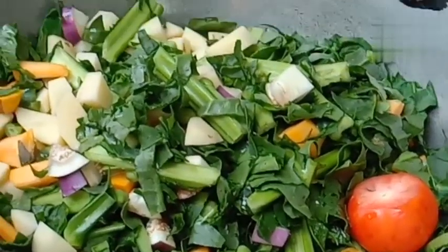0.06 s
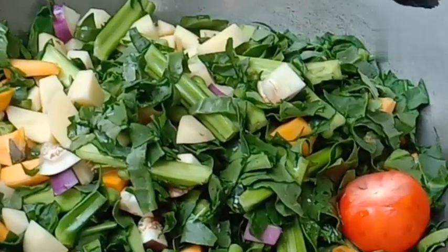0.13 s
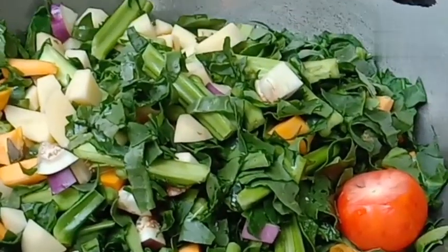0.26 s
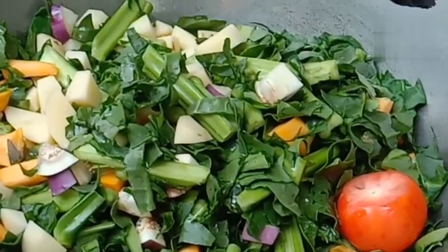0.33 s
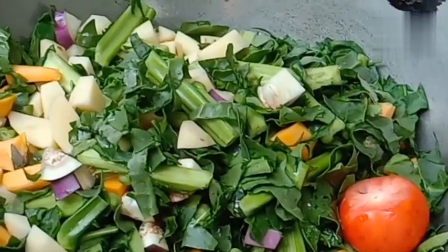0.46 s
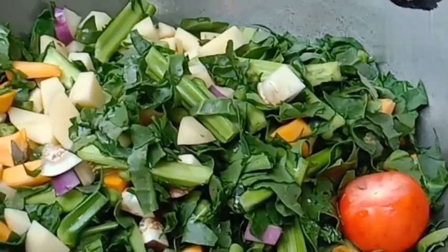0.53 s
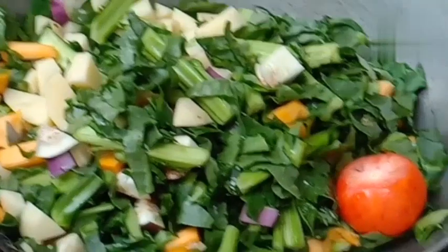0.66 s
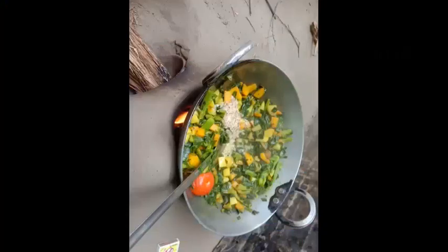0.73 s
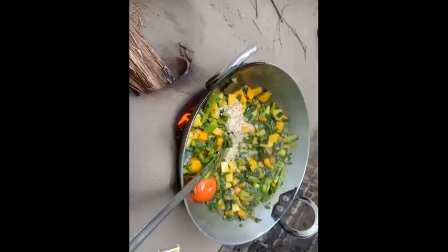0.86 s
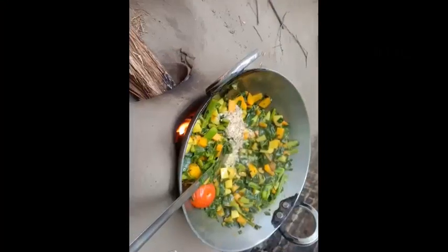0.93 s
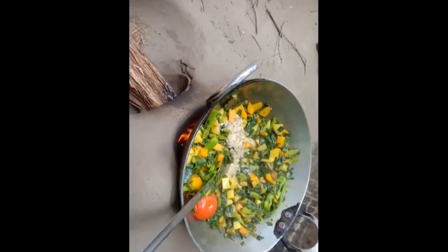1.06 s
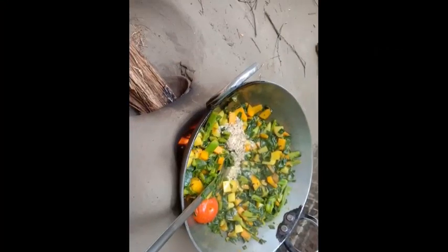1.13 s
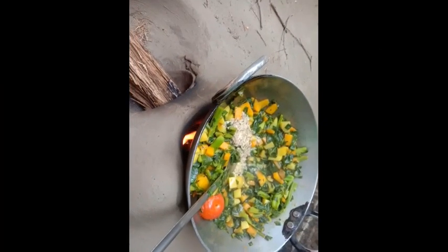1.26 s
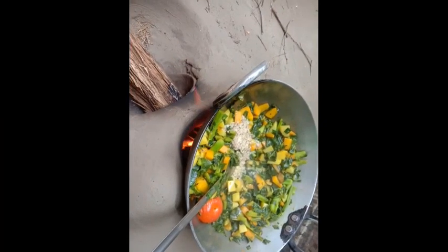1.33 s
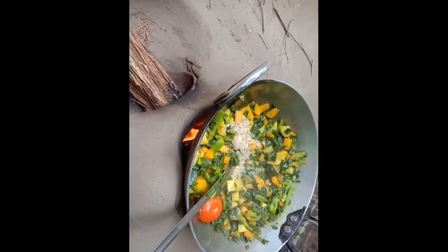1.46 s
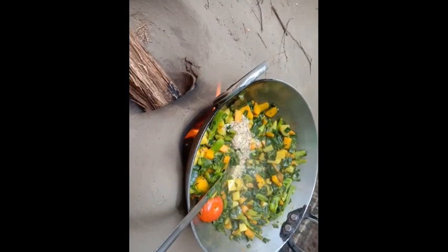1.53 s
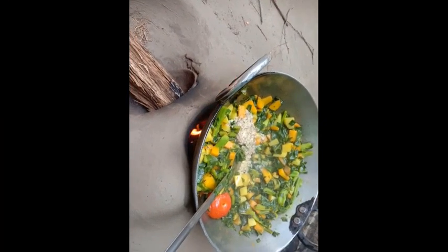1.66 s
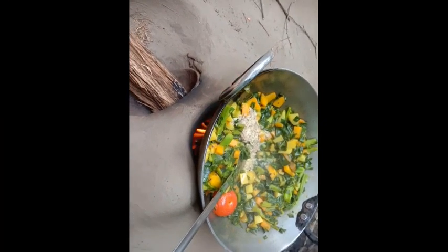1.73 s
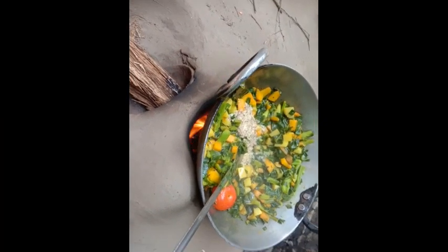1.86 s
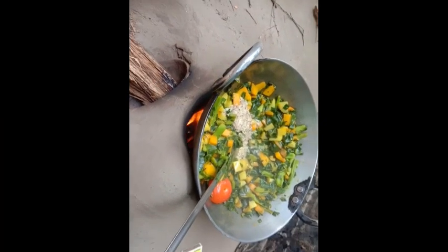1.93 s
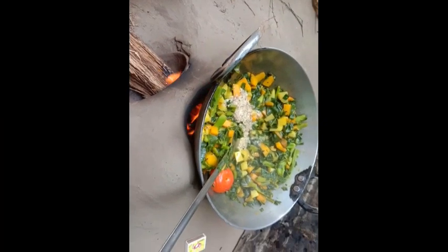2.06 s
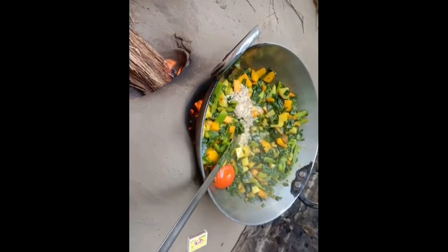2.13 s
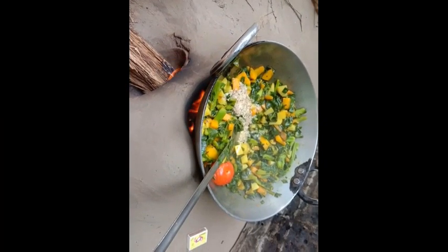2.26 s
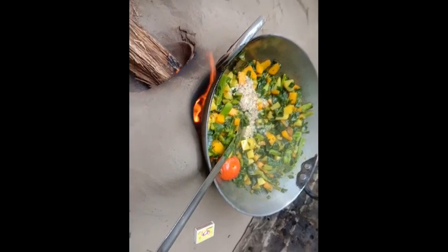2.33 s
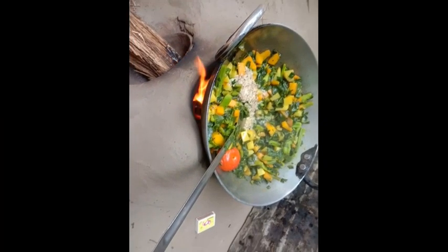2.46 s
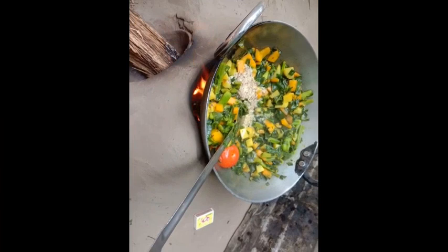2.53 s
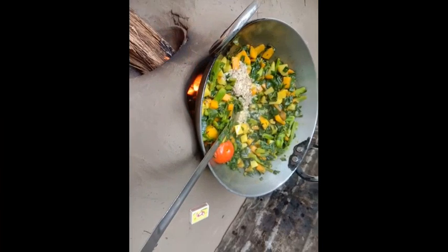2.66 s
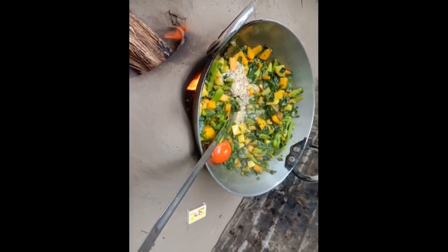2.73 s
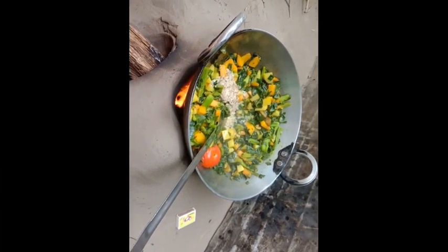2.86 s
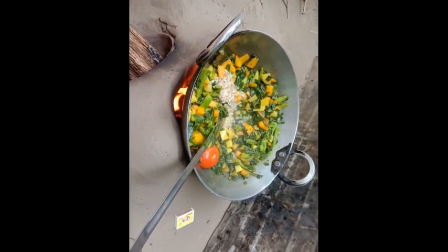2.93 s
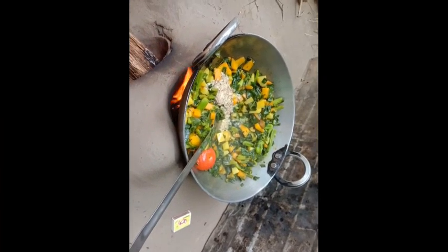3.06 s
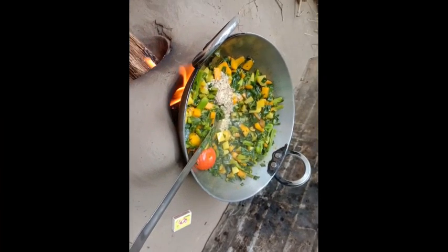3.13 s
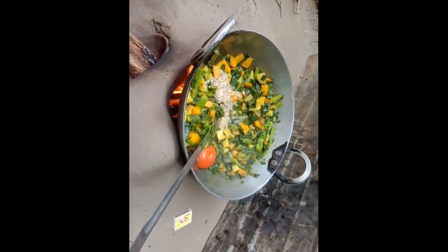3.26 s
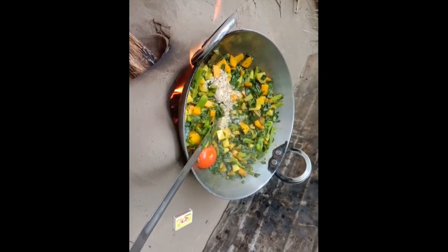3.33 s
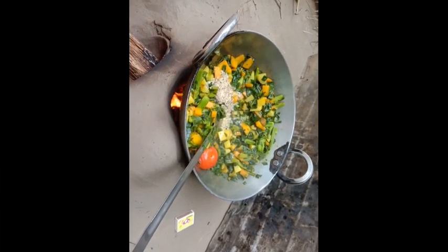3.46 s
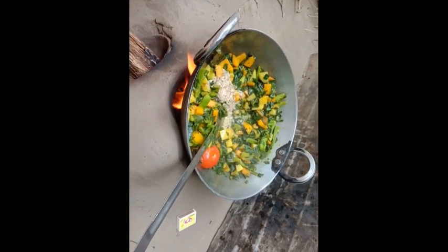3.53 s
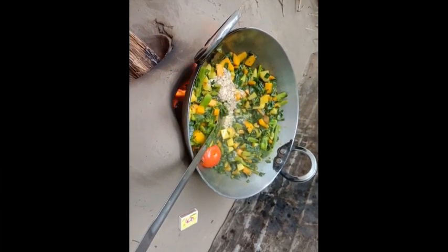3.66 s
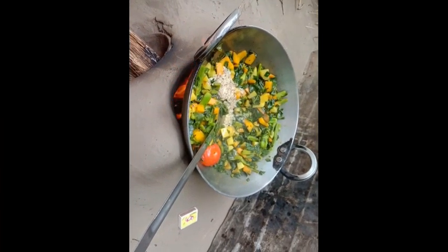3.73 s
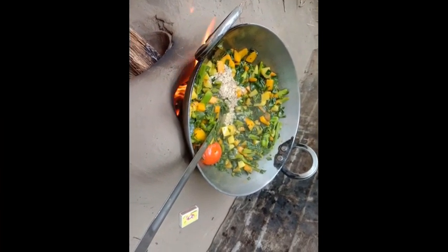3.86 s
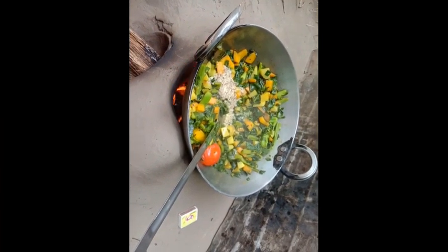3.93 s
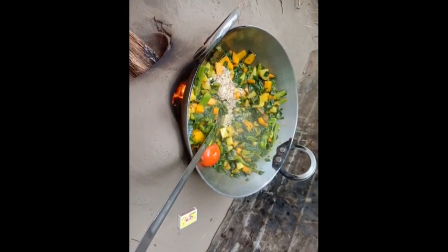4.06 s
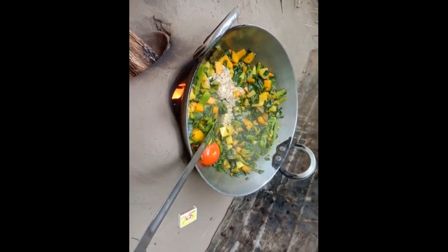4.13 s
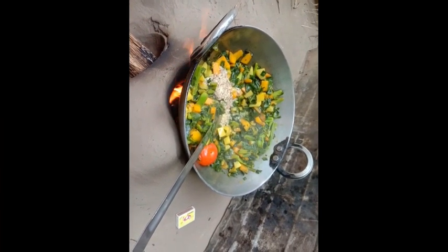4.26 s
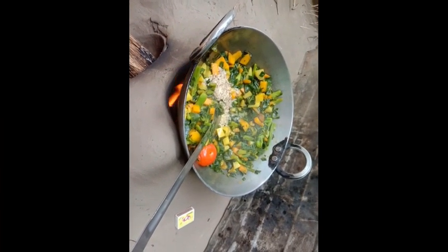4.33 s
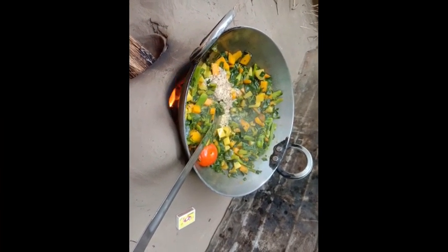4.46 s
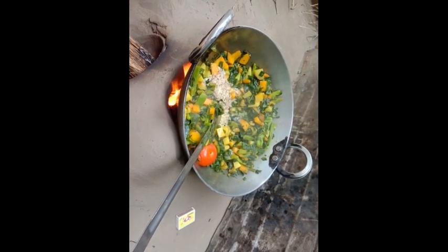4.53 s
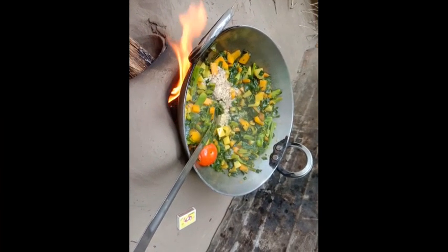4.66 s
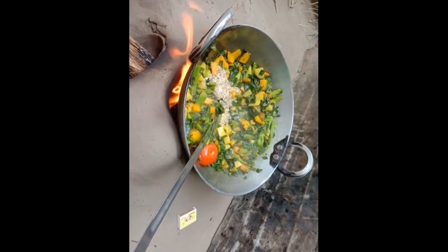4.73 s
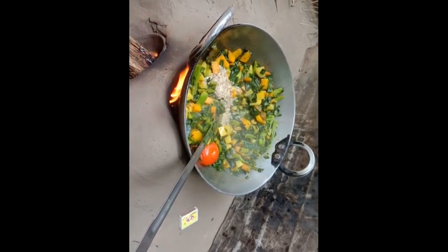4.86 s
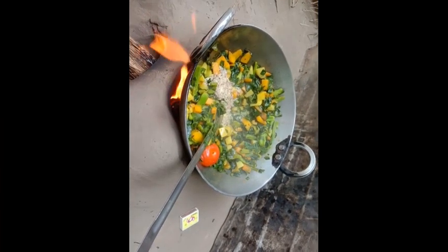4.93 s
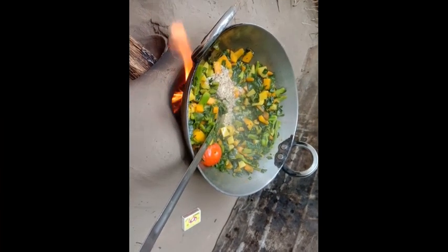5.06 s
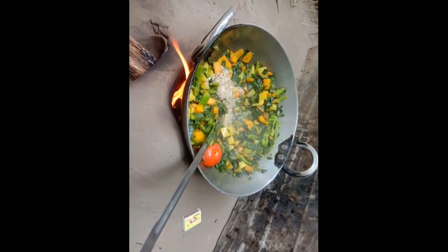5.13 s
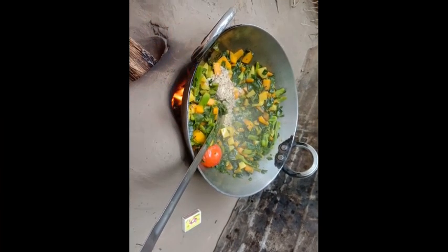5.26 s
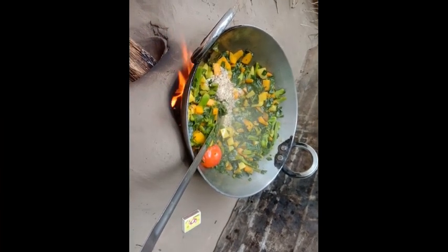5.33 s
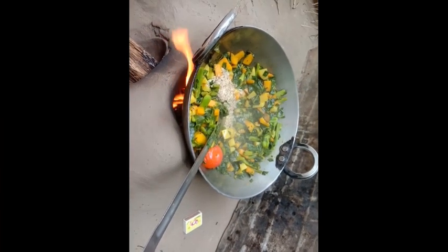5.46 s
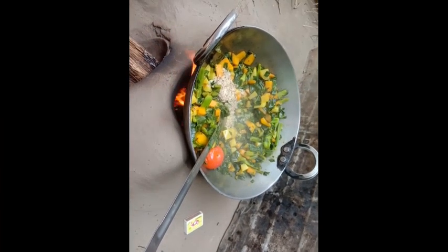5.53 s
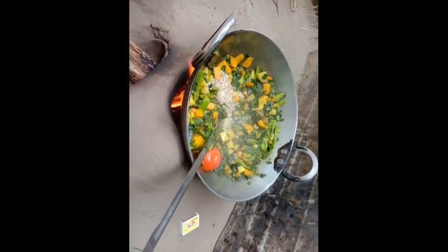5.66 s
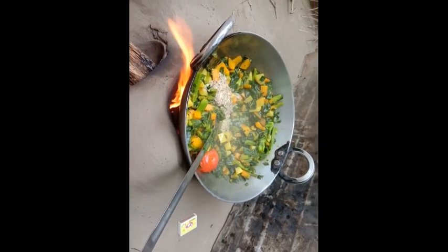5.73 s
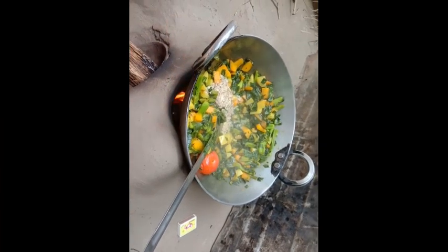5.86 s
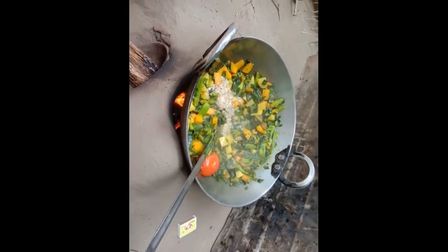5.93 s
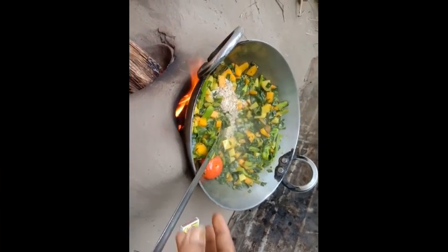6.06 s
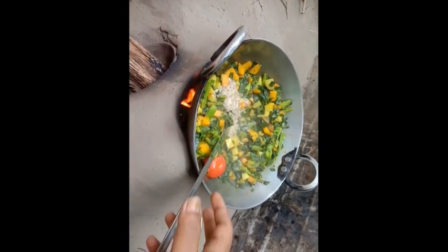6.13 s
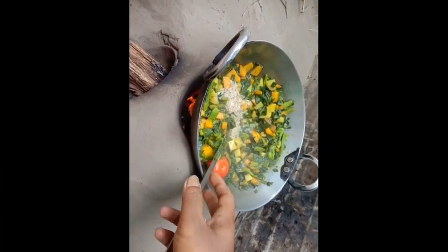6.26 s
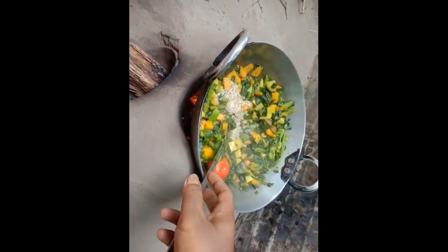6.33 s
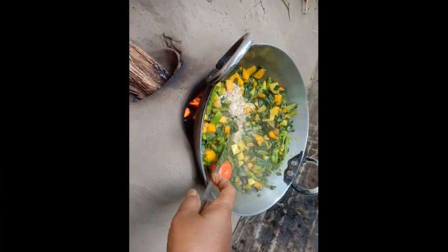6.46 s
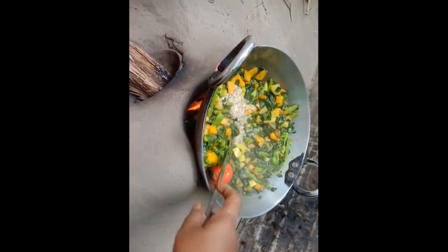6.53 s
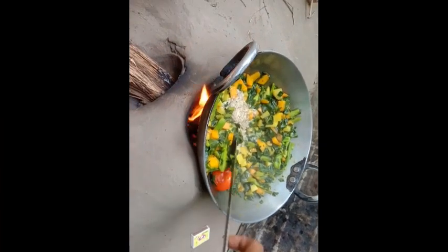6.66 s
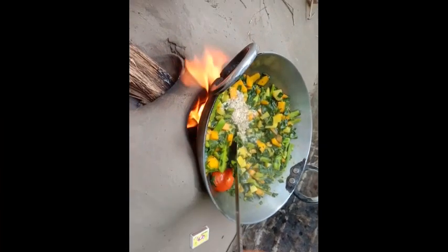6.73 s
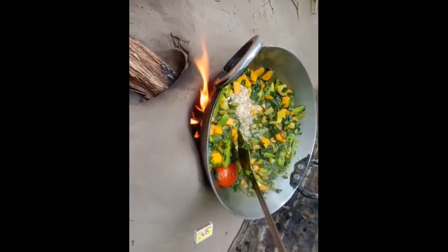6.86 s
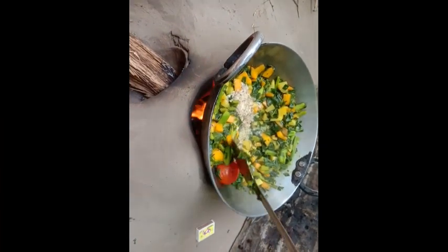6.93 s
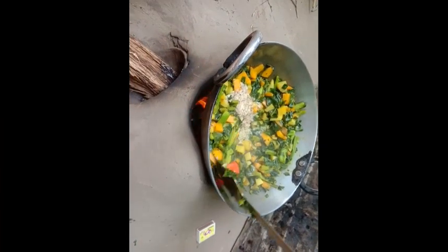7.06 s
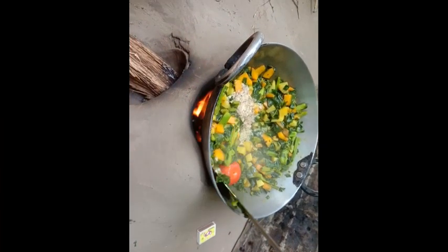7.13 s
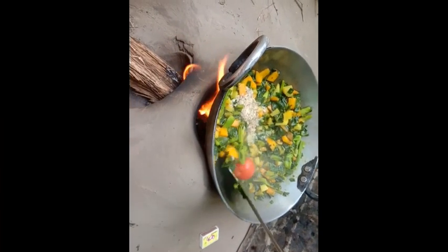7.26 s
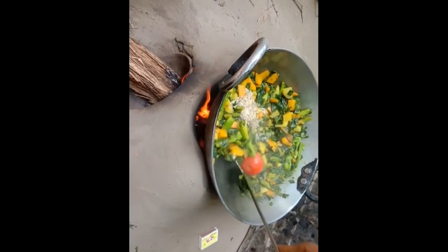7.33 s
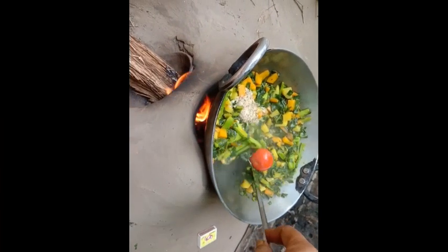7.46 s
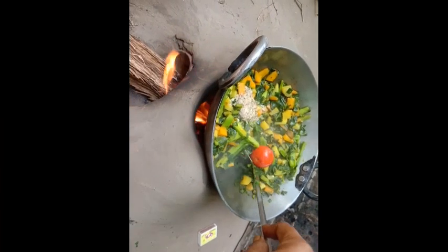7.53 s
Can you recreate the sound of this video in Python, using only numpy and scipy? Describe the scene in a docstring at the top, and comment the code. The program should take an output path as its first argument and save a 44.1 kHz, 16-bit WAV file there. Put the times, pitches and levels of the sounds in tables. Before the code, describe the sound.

Vegetables sizzle loudly up close, dip to silence, then fry more quietly over a puffing wood fire before a metal ladle clinks and scrapes.

```python
"""Chopped vegetables sizzle in a steel pan over a wood fire, first from close by, then, after a cut, from above.
Random bursts of many sizes make the hiss; short snaps with a spray are water spitting in the oil or dry pops.
Below, flames flutter as low noise and puff as short low waves, and hollow notes swell in the pan.
Near the end a metal ladle clinks on the pan as damped steel modes and scrapes through the vegetables."""
import sys
import numpy as np
from scipy import signal
from scipy.fft import rfft, irfft, next_fast_len
from scipy.io import wavfile
from scipy.ndimage import uniform_filter1d

SR = 44100
rng = np.random.default_rng(int(sys.argv[2]) if len(sys.argv) > 2 else 0)


def inscribe(sig):
    """Save sig as 16-bit PCM at rate SR to the path in sys.argv[1].

    A 1-D sig is mono; a 2-D sig holds one channel per row.
    Samples are clipped to [-1, 1] before scaling.
    """
    pcm = np.round(np.clip(np.atleast_2d(sig).T, -1, 1) * 32767)
    wavfile.write(sys.argv[1], SR, pcm.astype(np.int16))


N = 334719
T = np.arange(N) / SR
CUT_S, RESUME_S = 0.7833, 0.86  # silence between the two viewpoints
SWITCH_S = RESUME_S - .05  # the viewpoint changes within that silence


def amp(db):
    """Decibels to gain."""
    return 10 ** (np.asarray(db) / 20)


def evened(x):
    """Scales to rms 1."""
    return x / np.sqrt(np.mean(x ** 2) + 1e-20)


def read(points, hz):
    """A spectrum in dB at the given frequencies, interpolated along log frequency."""
    f, db = np.transpose(points)
    return np.interp(np.log(hz + 1), np.log(f + 1), db)


def bell(x, centre, width):
    """A smooth bump of height 1 over frequency or time."""
    return np.exp(-.5 * ((x - centre) / width) ** 2)


def add(mix, s, sound):
    """Lays a sound into the mix at time s."""
    part = mix[max(round(s * SR), 0):][:len(sound)]
    part += sound[:len(part)]


def coloured(x, points, size=4096):
    """Causal filter with the given spectrum and unit energy: clicks keep their sharp fronts."""
    hz = abs(np.fft.fftfreq(size, 1 / SR))
    log_gain = np.log(amp(np.maximum(read(points, hz), -100)))
    minimum_phase = np.exp(np.conj(signal.hilbert(log_gain)))
    taps = np.fft.ifft(minimum_phase).real[:size // 2]
    return signal.oaconvolve(x, taps / np.linalg.norm(taps))[:len(x)]


def noise(points):
    """Steady noise of rms 1 with the given spectrum."""
    return evened(coloured(rng.standard_normal(N), points))


def patches(shape, order, size):
    """Random field of rms 1, smoothed over order bins and size frames."""
    field = rng.standard_normal(shape)
    for _ in range(2):
        field = uniform_filter1d(field, order, axis=0)
        field = uniform_filter1d(field, size, axis=1)
    return evened(field)


def waver(db, size):
    """A gain that wanders by some dB (rms), smoothed over size hundredths of a second."""
    frames = np.arange(0, N / SR + .01, .01)
    wander = patches((1, len(frames)), order=1, size=size)[0]
    return amp(db * np.interp(T, frames, wander))


def swells(rows, step=32):
    """A gain that rises smoothly to each height and falls again; rows are (t/s, level/dB, rise/s, fall/s)."""
    t = T[::step]
    power = sum((amp(db) * bell(t, s, np.where(t < s, rise_s, fall_s))) ** 2
                for s, db, rise_s, fall_s in rows)
    return np.interp(T, t, np.sqrt(power + 1e-16))


def microphone(t):
    """Level and colour at the times t, gliding from each resting place to the next."""
    # distance and bowl reflections by place; the first row holds from the start, so its times are not used
    # (middle of move t/s, length of move/s, frying level/dB, hollow/dB, sheen f/Hz, sheen/dB,
    #  top/dB, rim ring/dB, fizz/dB)
    places = [(0, 0.082, -22.5, -0.5, 5220, -1, 8.5, 7, -4.5),
              (.82, .05, -30.5, -2, 6130, 5.5, 0, 8.5, 6.5),
              (2.36, 0.33, -33.5, -10, 5740, -3.5, 4.5, -2, 7.5),
              (3.75, 0.11, -32.5, -9.5, 5250, 3, 5, -5, 3), (5.87, 0.57, -36, 0, 5880, 5.5, 5.5, -2.5, 1),
              (7.2, 0.6, -38.5, -3, 5850, 2, 3.5, -8, 1)]
    now = np.array(places[0][2:])[:, None]
    for s, move_s, *place in places[1:]:
        moved = np.clip((t - s) / move_s + .5, 0, 1)
        now = now + (np.array(place)[:, None] - now) * moved
    return now


def bubbles(per_s, spread_db, scatter_s, scatter):
    """Bursts of widely differing size; each rings about a cycle at its own pitch and scatters around the bowl."""
    happens = rng.random(N) < per_s / SR
    size = amp(spread_db * np.minimum(rng.exponential(1, N), 4)) * happens
    pitches_hz = np.geomspace(900, 15000, num=24)
    t = np.arange(512) / SR
    kind = rng.integers(0, len(pitches_hz), N)
    out, power = np.zeros(N), 0
    for k, hz in enumerate(pitches_hz):
        path = rng.standard_normal(len(t)) * np.exp(-t / scatter_s)
        path *= scatter / np.linalg.norm(path)
        path[0] += (-1) ** k  # the direct sound
        ring = np.sqrt(hz) * np.exp(-t * hz / 0.74) * np.cos(2 * np.pi * hz * t)
        burst = signal.fftconvolve(path, ring)[:len(t)]
        power = power + abs(rfft(burst)) ** 2
        out += signal.oaconvolve(size * (kind == k), burst)[:N]
    # undo the summed spectrum, so that all bursts together are white
    even = np.transpose([np.fft.rfftfreq(len(t), 1 / SR), -10 * np.log10(power)])
    return evened(coloured(out, even))


def sizzle():
    """A wash of tiny bubbles plus separate crackles, coloured by where the microphone is."""
    # colour of the frying from three microphone places (f/Hz, relative level per Hz/dB)
    close_colour, above_colour, aside_colour = [(260, -41), (450, -34.5), (652, -10.5), (713, -14),
                                                (1150, -6), (1250, -1.5), (1410, -9.5), (2010, -4.5),
                                                (3590, -13.5), (5690, -0.5), (7210, -13), (9140, -22),
                                                (13600, -29), (14700, -25), (15600, -7)], [(260, -17), (470, -23), (630, -13.5),
                                                               (780, -11.5), (1060, -3.5), (1270, 1),
                                                               (1710, -2.5), (2520, -2.5), (3540, -14),
                                                               (3760, -9), (5770, 0), (6600, -13),
                                                               (7050, -7), (8490, -17.5), (11300, -20),
                                                               (13100, -31.5), (15600, -20.5)], [(260, -14.5), (450, -13),
                                                                              (692, -13), (864, -2.5),
                                                                              (1250, 5), (1410, -2.5),
                                                                              (1540, 1), (2410, -2),
                                                                              (2920, -1.5), (4170, 0.5),
                                                                              (4760, -1), (7110, -3),
                                                                              (8700, -13), (13100, -28),
                                                                              (14700, -20.5), (15600, -8)]
    # the wet heap hisses evenly, then crackles more (t/s, weight of the crackle)
    drying = [(0, 0.27), (1, 0.31), (2.4, 0.51), (4.5, 0.68)]
    # the upper notch of the hollow in the frying climbs as the microphone drifts (t/s, f/Hz)
    hollow_path = [(3.4, 3350), (5.2, 3740)]
    speckle_db, flicker_db, ripple_db = 2.4, 0.7, 2.6  # from pitch to pitch, over time, from the wall's echo

    wash = bubbles(per_s=7000, spread_db=0.3, scatter_s=0.0034, scatter=1.17)
    crackle = bubbles(per_s=420, spread_db=2.5, scatter_s=0.0065, scatter=0.93)
    hz, t, (wash, crackle) = signal.stft([wash, crackle], SR, nperseg=1024, noverlap=768)
    hz = hz[:, None]
    # power share of the crackle; it stands out most in the treble
    share = np.clip(np.interp(hz, [1000, 5000, 11000], [.45, .36, .5]), 0, 1)
    share = np.clip(share * np.interp(t, *np.transpose(drying)), 0, 1)

    aside = np.clip((t - 5.78) / 0.12, 0, 1)
    later_db = (1 - aside) * read(above_colour, hz) + aside * read(aside_colour, hz)
    db = np.where(t < SWITCH_S, read(close_colour, hz), later_db)
    level_db, hollow_db, sheen_hz, sheen_db, top_db, ring_db, fizz_db = microphone(t)
    climbing_hz = np.interp(t, *np.transpose(hollow_path))
    db = db + hollow_db * (bell(hz, 3105, 140) + bell(hz, climbing_hz, 120))
    db = db + sheen_db * bell(hz, sheen_hz, 270)
    db = db + top_db * bell(hz, 7210, 600)
    db = db + ring_db * bell(hz, 1241, 23)
    db = db + 2.15 * bell(hz, 2970, 170)
    db = db + fizz_db * bell(hz, 15100, 900)
    # a wall echo ripples the middle, coming in from 3 to 4 s
    db = db + ripple_db * np.cos(2 * np.pi * hz / 405) * bell(hz, 1860, 470) * np.clip(t - 3, 0, 1)
    db = db + speckle_db * patches(db.shape, order=2, size=9)  # single spots simmer briefly at their own pitch
    db = db + flicker_db * patches(db.shape, order=100, size=2)  # broad bands flutter quickly

    # hold the smoothed middle band steady, so that the microphone sets the level
    middle = (hz[:, 0] > 900) & (hz[:, 0] < 3000)
    middle_power = (amp(db)[middle] ** 2).sum(0)
    gain = amp(db) / np.sqrt(uniform_filter1d(middle_power, size=25) / len(hz))
    mixed = gain * (np.sqrt(1 - share) * wash + np.sqrt(share) * crackle)
    hiss = signal.istft(mixed, nperseg=1024, noverlap=768)[1][:N]
    return hiss * amp(np.interp(T, t, level_db))


def fire(puff_s=0.0056, snap_db=-11):
    """Flames flutter, air draws through the stove, and gas catches in short puffs that stir up the flames."""
    # colours of the flames and of the drawn air (f/Hz, relative level per Hz/dB)
    flutter_colour, draught_colour = [(20, -31), (45, -20.5), (80, 3), (130, -3.5), (200, -28),
                                      (400, -58.5)], [(60, -32.5), (120, -2.5), (165, 3), (195, -6),
                                                       (240, -22), (380, -20), (700, -51)]
    # flames catch with a soft puff (t/s, level/dB, f/Hz)
    puffs = [(0.08, -27, 86), (0.961, -29.5, 118), (1.17, -34, 101), (1.379, -20, 79.5), (1.409, -27, 86.4),
             (1.479, -27.5, 119), (1.564, -23.5, 89), (1.658, -19.5, 110), (2.036, -24.5, 84),
             (2.351, -28.5, 78.6), (3.826, -32.5, 142), (4.218, -14.5, 82.5), (4.255, -32, 105),
             (5.189, -27.5, 113), (5.255, -29, 95), (5.315, -25, 80), (5.698, -16.5, 80),
             (5.788, -22.5, 81.5), (5.828, -23.5, 82), (5.858, -20.5, 80), (5.96, -40, 90),
             (6.867, -17, 78), (6.923, -21.5, 88), (7.358, -34, 70), (7.565, -32, 105)]
    # air draws harder through the stove (t/s of the height, level/dB, rise/s, fall/s)
    draws = [(1.62, -43.5, 0.24, 0.11), (2.04, -41.5, 0.19, 0.072), (3.22, -38.5, 0.46, 0.18),
             (4.9, -44.5, 0.07, 0.15), (5.2, -38, 0.081, 0.051)]
    flutter_db, draught_db = -54.5, -56  # the fire burning quietly
    # flames flutter harder around each puff: level against the puff, and at most
    flare_rise_s, flare_fall_s, flare_db, flare_most_db = 0.024, 0.052, -13.5, -35.5

    flares = swells([(s, min(db + flare_db, flare_most_db), flare_rise_s, flare_fall_s) for s, db, _ in puffs])
    flutter = noise(flutter_colour) * np.hypot(amp(flutter_db), flares)
    draught = noise(draught_colour) * np.hypot(amp(draught_db), swells(draws))
    out = flutter * waver(4, size=6) + draught * waver(1.6, size=6)  # the draught is steadier
    t = np.arange(-SR // 20, SR // 10) / SR
    for s, db, hz in puffs:
        push = bell(t, 0, np.where(t < 0, puff_s, 1.65 * puff_s))
        octave = amp(snap_db) * push * np.sin(4 * np.pi * hz * t)  # the front steepens at the height of the puff
        wave = np.cos(2 * np.pi * hz * t) + octave
        add(out, s + t[0], amp(db) * push * wave)
    return out


def hollow(hz, rub_db, rub_hz):
    """One low note of the loaded pan inside a band of rubbing noise."""
    size = next_fast_len(N)
    band = bell(np.fft.rfftfreq(size, 1 / SR), hz, rub_hz)
    rub = irfft(rfft(rng.standard_normal(size)) * band, size)[:N]
    return np.cos(2 * np.pi * hz * T) + amp(rub_db) * evened(rub)


def thuds(shift_hz=340, steam_hz=305.2, steam_s=0.015, rumble_db=-15, rumble_lasts=2.44):
    """Soft pushes swell a low note of the pan: with rumble as the heap shifts, short as steam breaks out."""
    # the heap of vegetables shifts and the pan answers (t/s of the height, level/dB, rise/s, fall/s)
    shifts = [(.01, -26, .03, 0.025), (.12, -30.5, .035, 0.036), (0.457, -20.5, 0.028, 0.059),
              (6.72, -51.5, 0.14, 0.2)]
    # short hollow thuds, likely steam breaking out under the heap (t/s, level/dB)
    steam_bursts = [(1.478, -42.5), (1.628, -44.5), (2.086, -43), (2.559, -42.5), (3.828, -44),
                    (4.993, -48), (5.385, -47.5), (6.588, -42.5), (6.686, -45)]
    settling = swells([(s, db + rumble_db, rise_s, rumble_lasts * fall_s) for s, db, rise_s, fall_s in shifts])
    rumble = noise([(40, -16.5), (90, -8), (170, 2.5), (270, -2), (400, -3.5), (700, -33.5)])
    steam = swells([(s, db, steam_s, steam_s) for s, db in steam_bursts])
    shift_notes = swells(shifts) * hollow(shift_hz, rub_db=-7.0, rub_hz=70)
    steam_notes = steam * hollow(steam_hz, rub_db=1, rub_hz=70)
    return shift_notes + settling * rumble + steam_notes


def snaps(snap_s=0.00042, spray_s=0.013):
    """Short snaps: drops spitting in the oil with a spray, and a few dry pops, likely firewood or the ladle."""
    # (t/s, peak level/dB, treble against middle/dB, finest spray against middle/dB, spray against snap/dB)
    pops = [(0.514, -9, 5, -12, -13), (0.559, -8, 10, -11, -6), (1.274, -9, -2, 10, -12),
            (1.910, -7, -1, 4, -10), (2.0185, -15, -16, -11, -28), (2.054, -8.5, -3, -5, -11),
            (2.1628, -12, -4, -15, -16), (2.275, -15.5, -4, -11, -2), (2.4532, -19, -12, -10, -22),
            (2.4809, -9.5, -12.5, -10, -16), (2.858, -12, -1, -10, -9), (3.125, -10.5, 7, 12, -8),
            (3.187, -11, -6, 21, -14), (3.241, -12, 8, 5, -12), (3.355, -16, -1, 2, -4),
            (4.426, -12, 3, -2, -13), (4.464, -8.5, -1, 2, -12), (4.5015, -9, 2, -10, -9),
            (4.867, -9, -4, -13, -13), (4.894, -9, 5, 8, -12), (5.316, -14.5, -12.5, -17, -11),
            (5.56, -12, -6.5, -7.5, -10), (5.569, -10, 2, -1, -5), (5.882, -13.5, -2.5, -21, -6),
            (6.197, -13, -1, -12, -11), (6.7152, -13, -7, -14, -30), (6.761, -8, -10, -9, -13)]
    out, t = np.zeros(N), np.arange(2048) / SR
    for s, db, treble_db, fine_db, spray_db in pops:
        grit = rng.choice([-1., 1.], len(t))
        burst = grit * (np.exp(-t / snap_s) + amp(spray_db) * np.exp(-t / spray_s))
        colour = [(500, -20.5), (1200, 5.0), (2600, 1.5), (3500, -10.5),
                  (5500, treble_db + 10.0), (7500, treble_db), (9500, treble_db - 18.0),
                  (13000, fine_db - 21), (15000, fine_db)]
        pop = coloured(burst, colour)
        add(out, s, amp(db) * pop / abs(pop).max())
    return out


def clinks(ring_db=5, favour_db=9, bowl_db=-26, graze=0.11):
    """Steel chatters on steel; the struck spot favours some modes, and a heavy blow flexes the whole pan."""
    # the ladle meets the pan (t/s, level/dB, favoured ring f/Hz, chatter decay/s, weight on the pan/dB)
    touches = [(5.82, -16, 11500, 0.033, -19), (6.068, -12.5, 15500, 0.0067, -25),
               (6.310, -6, 6300, 0.013, -11), (6.3858, -5, 7200, 0.0017, -15),
               (6.4065, -10.5, 5860, 0.02, -15), (6.433, -15, 7130, 0.017, -28),
               (6.4565, -7, 6400, 0.01, -25), (6.482, -3.5, 5880, 0.011, -24),
               (6.494, -12.5, 15500, 0.023, -30), (7.119, 2, 7320, 0.0045, -1),
               (7.124, -9, 7160, 0.002, -9)]
    # ringing modes of pan and ladle (f/Hz, relative level/dB, undamped t60/s)
    steel_modes = [(1560, -10, 0.049), (2880, -3.5, 0.031), (3440, -3, 0.028), (3970, -8, 0.056),
                   (4770, -6, 0.045), (5400, -6, .05), (5880, -1, 0.089), (6200, -5, 0.19),
                   (7130, -0.5, 0.14), (8080, -4, 0.036), (8960, -13, 0.04), (10070, -3, 0.028),
                   (10900, -15, 0.19), (15500, -2, 0.067)]
    # the whole pan flexing (f/Hz)
    bowl_modes = [338, 443]
    # colour of the chatter (f/Hz, relative level per Hz/dB)
    contact_colour = [(470, -59), (800, -36), (1240, -9.5), (2360, -28), (2840, -17), (4500, -9),
                      (5700, -1.5), (7040, -1), (7680, -5), (13100, -14), (15600, -2.5)]

    out, t = np.zeros(N), np.arange(SR // 4) / SR
    for s, db, spot_hz, chatter_s, weight_db in touches:
        chatter = np.exp(-t / chatter_s)
        grit = coloured(rng.standard_normal(len(t)) * (chatter + 0.05 * np.exp(-t / 0.038)), contact_colour)
        ring = np.zeros(len(t))
        for hz, mode_db, t60 in steel_modes:
            level = amp(mode_db + favour_db * bell(hz, spot_hz, 300) - 60 * t / t60)
            ring += level * np.sin(2 * np.pi * (hz * t + rng.random()))
        ring *= 0.17 + chatter  # the vegetables soon damp the ring
        onset = 1 - np.exp(-t / (0.00018 + graze * chatter_s))  # a grazing touch builds more slowly
        clink = (evened(grit) + amp(ring_db + 0.4 * weight_db) * evened(ring)) * onset
        flexing = sum(np.sin(2 * np.pi * hz * t) for hz in bowl_modes)
        bowl = amp(bowl_db + weight_db - 60 * t / 0.13) * flexing
        add(out, s, amp(db) * (clink / abs(clink).max() + bowl))
    return out


def resonate(x, hz, width_hz):
    """A resonance that follows the curve hz: shift it down to zero, low-pass, shift it back."""
    turn = np.exp(2j * np.pi * np.cumsum(hz) / SR)
    return (turn * signal.lfilter(*signal.butter(2, width_hz, fs=SR), x / turn)).real


def scrape(body_db=-7.0, heap_db=-16, heap_lasts=2.65, catch_db=1.3, tumble_db=4):
    """The ladle's edge slips in fine jerks that hiss and ring the pan's wall; the heap tumbles for longer."""
    # the ladle slides along the steel (t/s of greatest force, level/dB, rise/s, fall/s, wall ring against hiss/dB)
    strokes = [(6.475, -42.5, 0.11, 0.04, 6), (7.313, -24, 0.025, 0.011, -9),
               (7.352, -23, 0.061, 0.039, -15.5), (7.41, -27.5, 0.029, 0.065, -8)]
    # colour of the edge's hiss (f/Hz, relative level per Hz/dB)
    edge_colour = [(2060, -50.5), (3500, -17), (5140, -11), (5800, 4.5), (6300, -4), (6750, -6),
                   (7100, -1.5), (8500, -17), (13500, -34)]
    # vegetables dragged over the pan (f/Hz, relative level per Hz/dB)
    heap_colour = [(50, -1), (105, 6), (170, 6), (230, -9), (330, 9), (400, 4), (500, -11), (900, -13)]
    body_colour = [(200, -29), (350, -2), (560, -30), (730, 2), (950, -1), (1280, 2), (1680, 3),
                   (2500, 0), (4500, -2), (10000, -44.5)]
    wall_hz, wall_glide_hz_per_s, wall_width_hz = 1288, 400, 89  # the ring rises as the ladle travels

    slips = bubbles(per_s=6000, spread_db=1.5, scatter_s=0.0029, scatter=0.91)
    hiss = evened(coloured(slips, edge_colour)) + amp(body_db) * evened(coloured(slips, body_colour))
    drag = swells([(s, db + heap_db, heap_lasts * (rise_s + fall_s) / 2, heap_lasts * fall_s)
                   for s, db, rise_s, fall_s, _ in strokes])
    out = hiss * swells([row[:4] for row in strokes]) * waver(catch_db, size=2)
    out += noise(heap_colour) * drag * waver(tumble_db, size=3)
    for s, db, rise_s, fall_s, wall_db in strokes:
        hz = wall_hz + wall_glide_hz_per_s * np.clip(T - s, -.2, .2)
        wall = evened(resonate(slips, hz, wall_width_hz))
        out += wall * swells([(s, db + wall_db, rise_s, fall_s)])
    return out


def scene():
    """All sources reach the pair of microphones alike, far louder on the right; a faint echo widens them."""
    sound = sizzle() + fire() + thuds() + snaps() + clinks() + scrape()
    left = amp(np.where(T < SWITCH_S, -16.9, -13.5))  # against the right
    t = np.arange(SR // 10) / SR
    walls = rng.standard_normal(len(t)) * amp(-60 * t / .15) * (t > .003)
    echo = amp(-40.5) * signal.oaconvolve(sound, walls / np.linalg.norm(walls))[:N]
    # opposite echoes cancel in mono; the last factor makes the mean of both sides equal the sound
    return np.array([left * sound + echo, sound - echo]) * 2 / (1 + left)


def record(dry, fade_out_s=0.12, fade_in_s=0.18, edge_hz=15620):
    """The sound fades out and in again around the cut, is clipped at full scale and loses its extreme top."""
    fade_out = np.clip((CUT_S - T) / fade_out_s, 0, 1) ** 0.89
    fade_in = np.clip((T - RESUME_S) / fade_in_s, 0, 1) ** 1.88
    clipped = np.clip(dry * (fade_out + fade_in), -1, 1)
    low_pass = signal.firwin(801, edge_hz, window=("kaiser", 8), fs=SR)
    return signal.oaconvolve(clipped, low_pass[None], "same")


dry = scene()
out = record(dry)
inscribe(out)
```